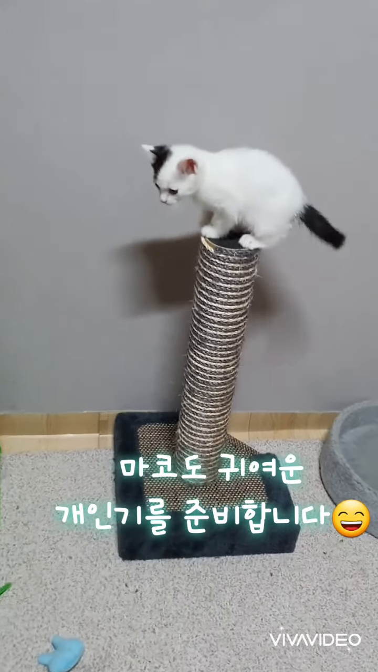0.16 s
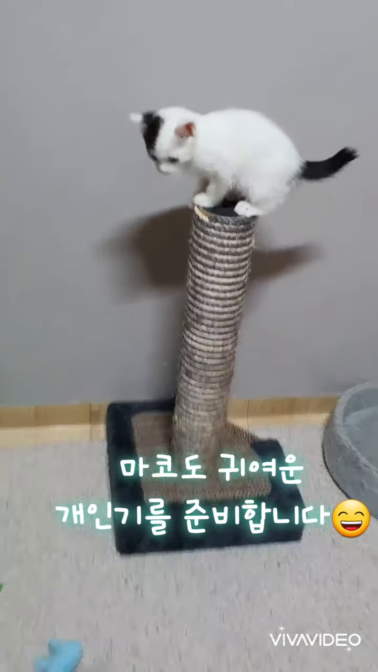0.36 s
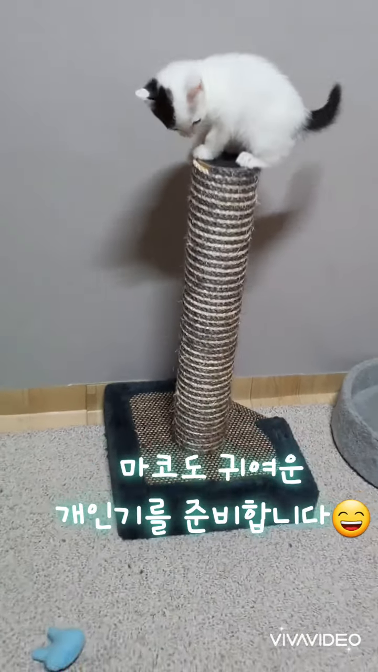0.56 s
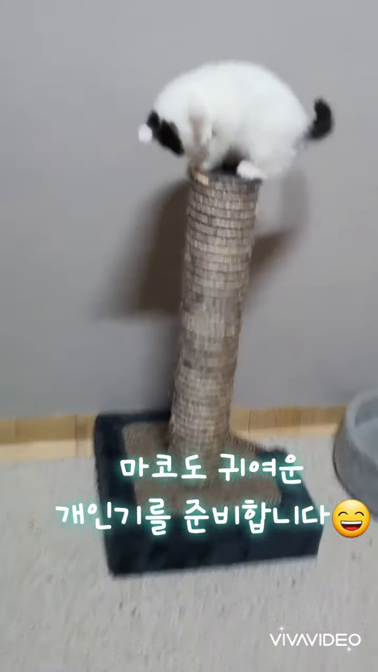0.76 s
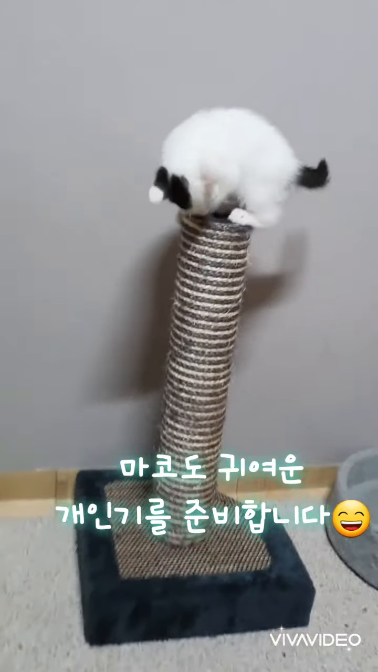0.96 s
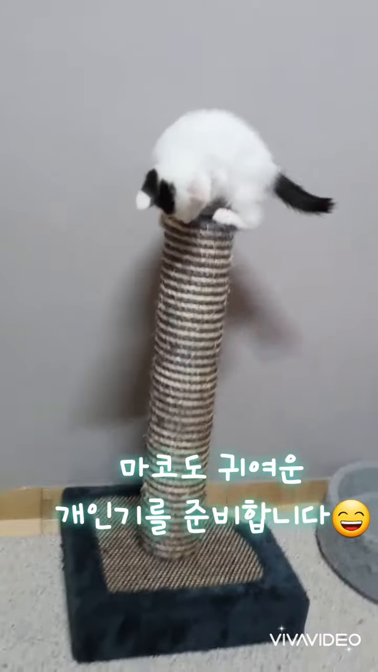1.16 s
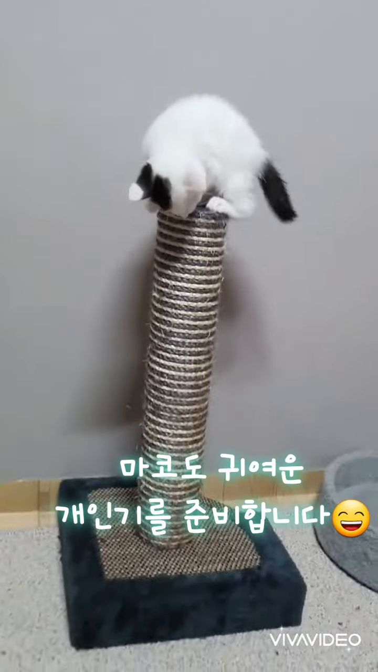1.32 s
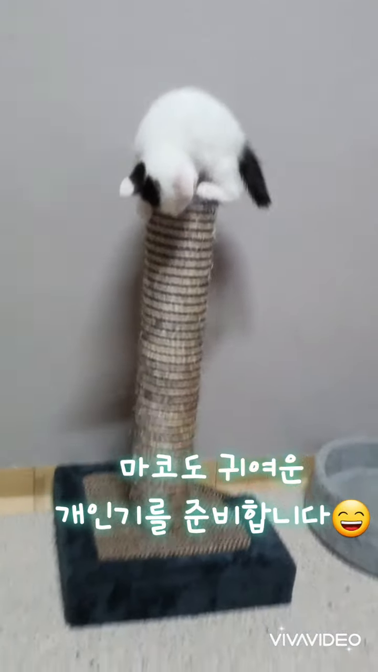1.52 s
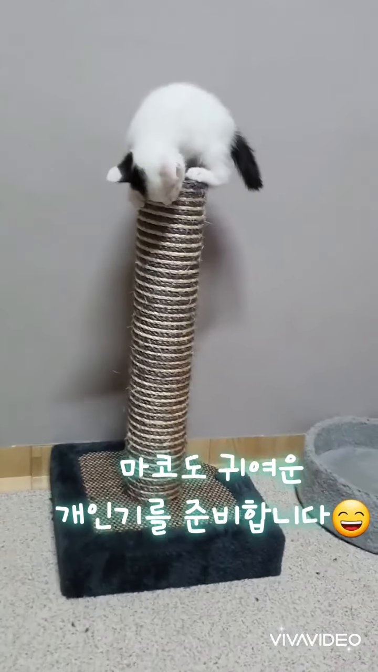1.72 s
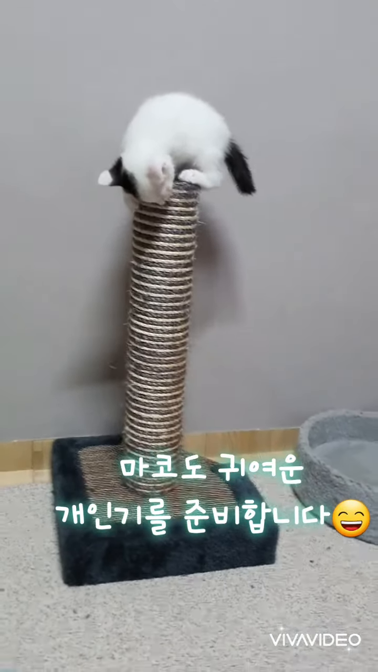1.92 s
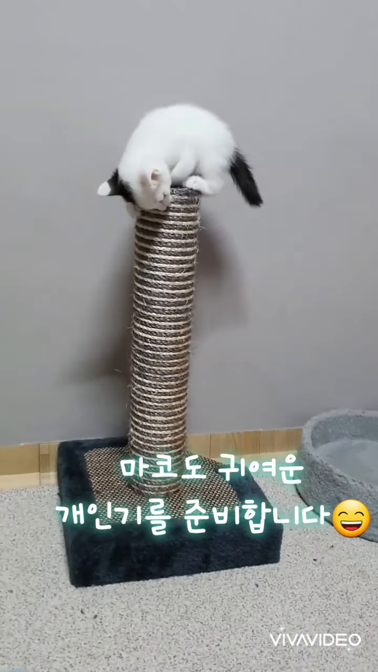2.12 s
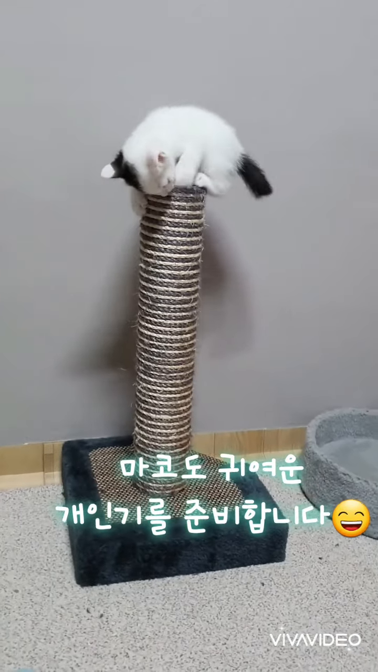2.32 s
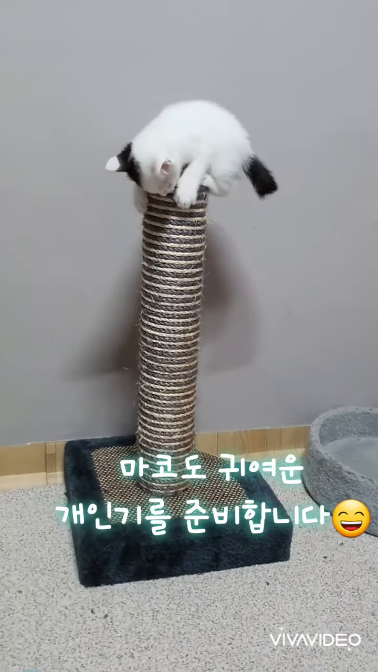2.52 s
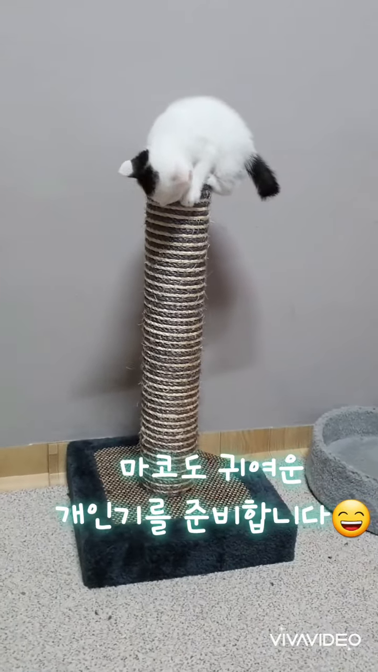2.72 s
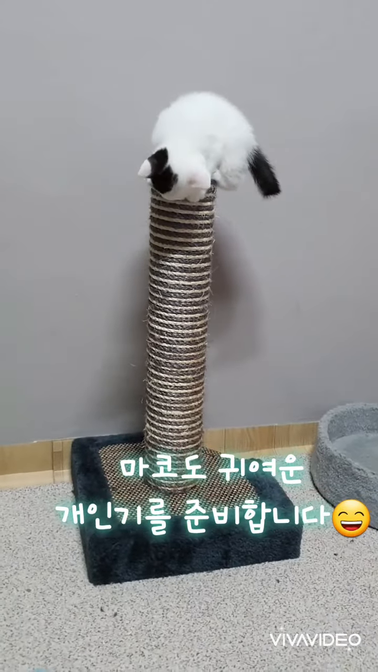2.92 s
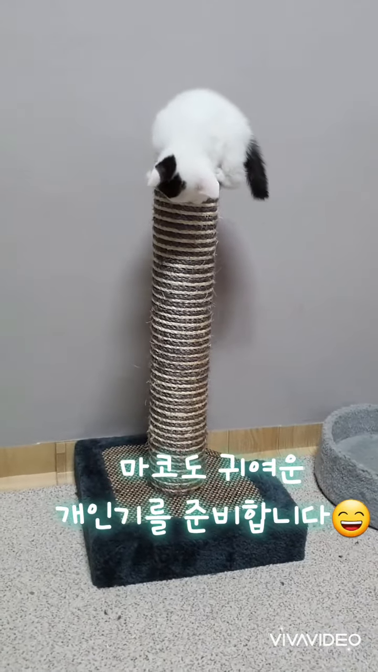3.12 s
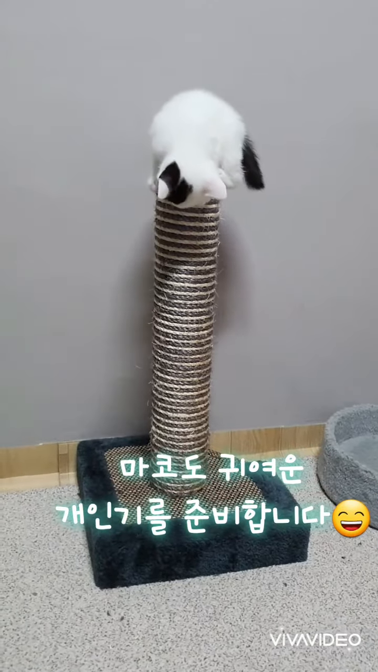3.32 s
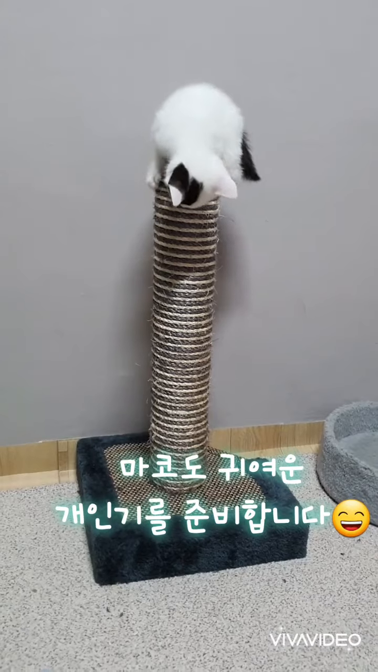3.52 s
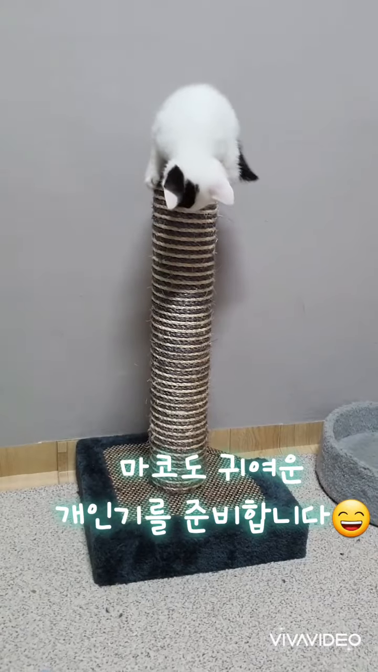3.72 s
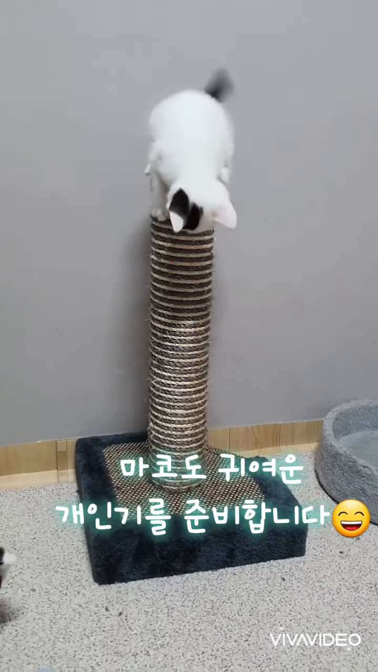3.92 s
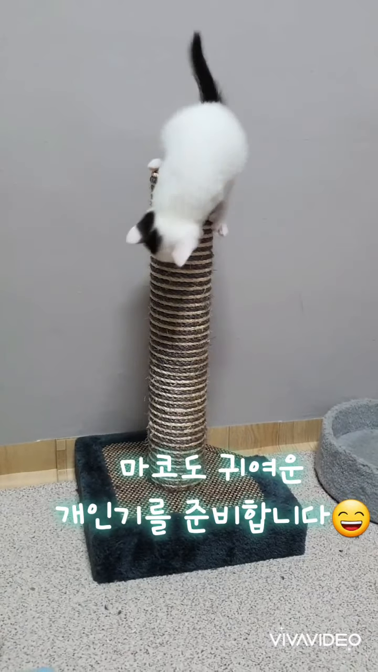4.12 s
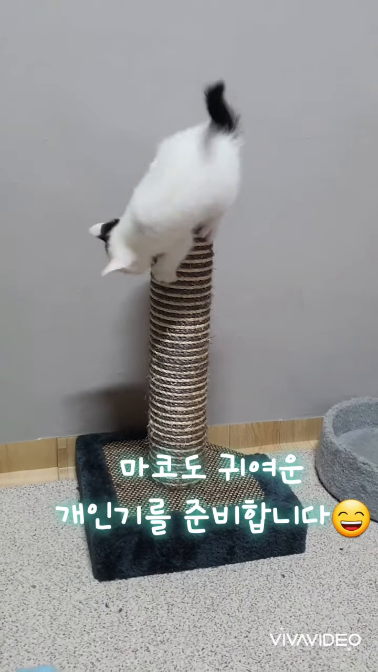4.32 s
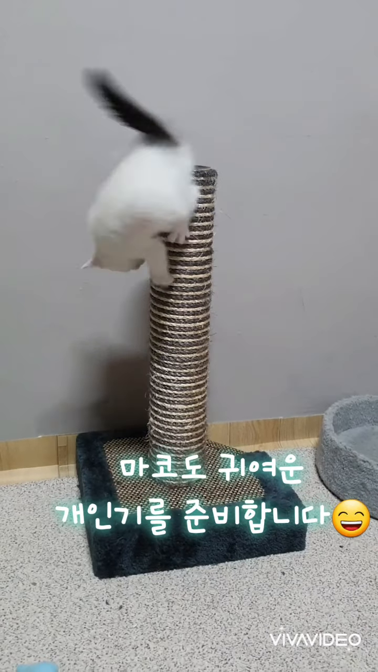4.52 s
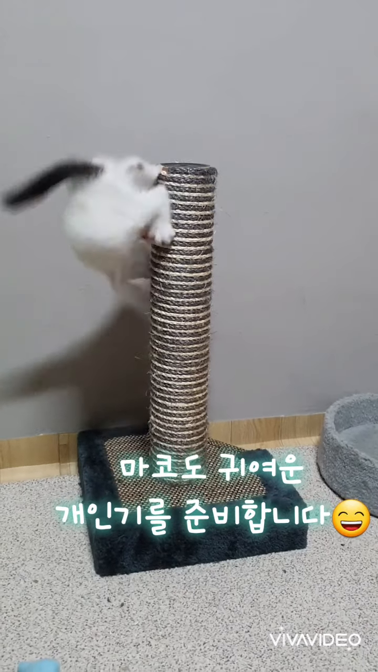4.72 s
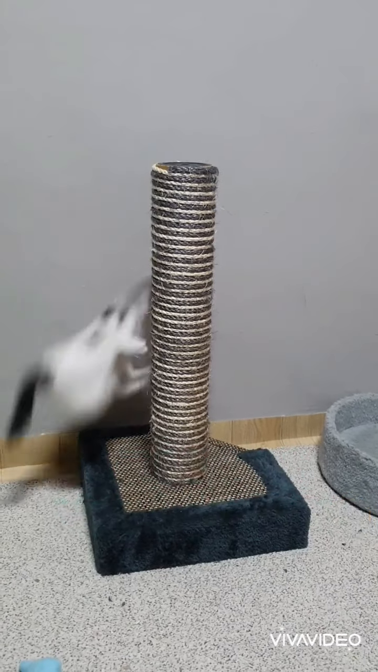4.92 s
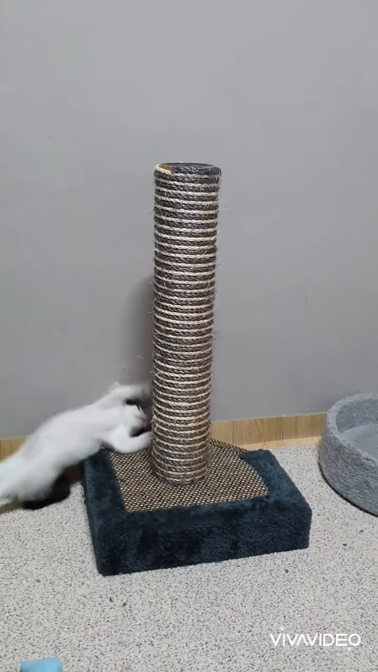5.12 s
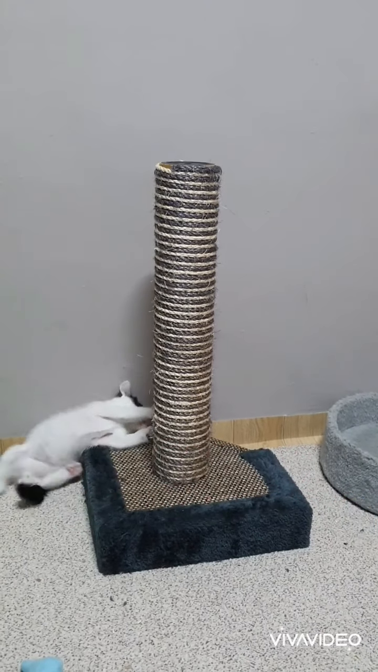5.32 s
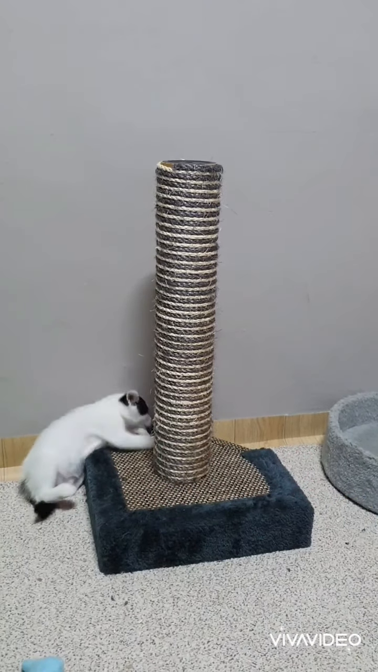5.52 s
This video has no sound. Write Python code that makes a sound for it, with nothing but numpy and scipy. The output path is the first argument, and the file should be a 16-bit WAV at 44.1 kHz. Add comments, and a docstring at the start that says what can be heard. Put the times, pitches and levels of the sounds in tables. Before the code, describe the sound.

A small bare-walled room with a short ring. Light paw thuds and thread ticks come first, then isolated claw plucks on coarse rope, a sharp snag just before three seconds, a quiet pause, and a final scrabble with hollow thumps as the kitten tumbles down. Thin hiss and low hand rumble lie beneath; the close phone sound leans right.

```python
"""Cloth rustles and ticks close to the right, over soft knocks; then a kitten claws a rope-wound scratching post.
Claws drag over the strands as random snaps and tear loose in short, fading bursts.
Paws and body knock the hollow post, heard as a set of decaying modes, and a bare-walled room rings on.
The microphone is a hand-held phone with two ports; hand rumble and a thin hiss lie underneath."""
import sys
import numpy as np
from scipy import signal
from scipy.fft import rfft, irfft
from scipy.io import wavfile

SR = 44100
rng = np.random.default_rng(int(sys.argv[2]) if len(sys.argv) > 2 else 0)


def transcribe(signal):
    """Save signal, clipped to [-1, 1], as a 16-bit WAV file at the path in sys.argv[1]."""
    frames = np.atleast_2d(signal).T
    limited = np.clip(frames, -1, 1)
    pcm = np.round(limited * 32767).astype(np.int16)
    wavfile.write(sys.argv[1], SR, pcm)


N = 245195
RING = SR * 3 // 4  # longest ringing, in samples

# Strokes of the claws over the rope.
# Each row: start in seconds, length in seconds, level in dB before the layer gains, relative treble in dB.
CLAW_DRAGS = [(1.076, .12, -54, 4), (1.24, 0.056, -58, -17), (1.601, 0.1, -46, -11),
              (2.23, 0.069, -51.5, -16), (2.369, .1, -52, -4), (2.515, .195, -37, -1.5),
              (2.803, 0.092, -48.5, 3), (3.18, 0.072, -59, -7), (3.497, 0.051, -58, -9.5),
              (3.938, 0.097, -51, 1), (4.049, 0.11, -49, 4.5), (4.255, 0.34, -41.5, 2),
              (4.587, 0.16, -37.5, -0.5), (4.743, 0.12, -40, 0.5), (4.846, 0.14, -40, 6.5),
              (5.029, 0.12, -34, -25), (5.25, 0.017, -53, -21)]
# Spectrum of the rasping rope. Each row: frequency in Hz, gain in dB.
ROPE_SPECTRUM = [(80, -11), (250, -3.5), (600, 2.5), (830, 7.5), (1300, 2.5), (2000, -6.5), (3000, -3.5),
                 (5000, -13), (11000, -17.5)]
# Spectrum of the loose fibres. Each row: frequency in Hz, gain in dB.
FIBRE_SPECTRUM = [(300, -37.5), (1500, -2), (3000, -2), (6000, 5.5), (11000, -6)]
# a stroke grips quickly, weakens as the leg draws in, and lets go
DRAG_ATTACK_S, DRAG_SAG_DB_PER_S, DRAG_RELEASE_S = 0.027, 17.5, 0.0053


def drags(rope_db=0.0, fibre_db=-5, jerk_db=4, jerk_rate=60):
    """Claws stick and slip from strand to strand: the rope rasps low, its loose fibres crackle high."""
    grip, fray = np.zeros((2, N))
    for start_s, length_s, db, treble_db in CLAW_DRAGS:
        envelope = stroke(start_s, length_s, DRAG_ATTACK_S, DRAG_SAG_DB_PER_S, DRAG_RELEASE_S)
        pull = undb(db) * envelope
        grip += pull
        fray += pull * undb(treble_db)
    jerks = unit(undb(jerk_db * walk(jerk_rate)))
    slips = snaps(rate=1500, spread_db=4.5) * grip * jerks
    # every strand has its own tension, so the octave bands of the rasp wander separately
    rasp = np.zeros(N)
    for low_hz in 75 * 2 ** np.arange(7):
        band = butter(slips + 1e-18, [low_hz, 2 * low_hz], "band")
        rasp += band * unit(undb(3.5 * walk(25)))
    crackle = snaps(rate=2000, spread_db=13.0) * fray * jerks
    scrape = undb(rope_db) * colour(rasp, ROPE_SPECTRUM) + undb(fibre_db) * colour(crackle, FIBRE_SPECTRUM)
    return place(scrape, left_db=-17, right_db=1.0, room_db=3.0)


# A claw catches and tears through fibres.
# Each row: start in seconds, level in dB before the layer gains, fading time constant in seconds,
# relative treble in dB, ring of the plucked strand in Hz.
CLAW_RIPS = [(0.876, -40, 0.022, -10, 1080), (1.241, -28.5, 0.0064, 5, 2500),
             (1.601, -39.5, 0.022, 4.5, 1320), (1.868, -37, 0.0097, -15, 1620),
             (2.214, -36.5, 0.0078, -2, 1710), (2.238, -26.5, 0.0039, -19, 1210),
             (2.509, -23, 0.014, -21, 1160), (2.528, -37.5, 0.019, 16, 1700), (2.695, -18, 0.0024, -2, 880),
             (2.865, -10, 0.016, -3, 2030), (3.179, -39.5, 0.0063, -1, 838),
             (3.909, -45.5, 0.028, 6.5, 1370), (3.989, -43, 0.0029, 18, 1000),
             (4.249, -36.5, 0.0073, 9, 830), (4.45, -29, 0.0046, -2, 1480), (4.493, -32, 0.0075, 9.5, 2330),
             (4.6, -31.5, 0.014, 12.5, 2750), (4.674, -19, 0.011, -12, 1710),
             (4.799, -16, 0.0021, 4.5, 880), (4.826, -26.5, 0.0074, 7, 1300), (4.867, -27.5, 0.007, 1, 770),
             (5.009, -23, 0.023, 8.5, 825), (5.137, -33.5, 0.0074, 5.5, 1610),
             (5.248, -48.5, 0.016, 6.5, 1210), (5.393, -62, .01, 10, 680),
             (5.546, -55.5, 0.0077, 0.5, 1290)]


def rips(rope_db=-1, fibre_db=-2, strand_db=-4, bite_s=0.00085):
    """A hooked claw bites and tears loose: snaps that fade out and set the strand ringing."""
    rope, strands, fibres = np.zeros((3, N))
    t = np.arange(RING) / SR
    coarse = snaps(rate=5000, spread_db=4.5)
    fine = snaps(rate=10000, spread_db=0.5)
    for start_s, db, fade_s, treble_db, strand_hz in CLAW_RIPS:
        bite = 1 - np.exp(-t / bite_s)
        pull = undb(db) * np.exp(-t / max(fade_s, 1 / SR)) * bite
        first = rng.integers(N - RING)  # a random stretch of snaps for each rip
        tear = pull * coarse[first:first + RING]
        ring = butter(tear, [strand_hz / 1.45, strand_hz * 1.45], "band")
        add(rope, start_s, tear)
        add(strands, start_s, ring * np.sqrt(SR / strand_hz) / 2)  # evens out the bandwidths
        add(fibres, start_s, pull * undb(treble_db + fibre_db) * fine[first:first + RING])
    sound = undb(rope_db) * colour(rope, ROPE_SPECTRUM) + undb(strand_db) * strands
    sound = sound + colour(fibres, FIBRE_SPECTRUM)
    return place(sound, left_db=-17.5, right_db=-6.0, room_db=-5.0)


# Paws and body knock the post.
# Each row: start in seconds, level in dB, pitch of the contact in Hz (low for soft pads, high for hard claws).
POST_KNOCKS = [(0, -54.5, 430), (0.14, -57, 373), (0.428, -56.5, 397), (0.535, -52, 192), (0.735, -48, 178),
               (1.062, -44, 300), (1.0798, -30, 383), (1.155, -47, 327), (1.239, -46, 390), (1.3, -40, 93),
               (1.347, -44.5, 170), (1.602, -38.5, 110), (1.614, -44.5, 365), (1.68, -42.5, 127),
               (1.871, -42, 276), (1.895, -39, 126), (2.235, -40.5, 274), (2.41, -55.5, 258),
               (2.515, -38.5, 257), (2.591, -37, 111), (2.672, -28.5, 195), (2.697, -26, 335),
               (2.733, -54, 110), (2.865, -18, 380), (3.188, -39, 266), (3.907, -55, 199),
               (3.984, -56.5, 249), (4.166, -49, 167), (4.26, -36.5, 202), (4.331, -44, 195),
               (4.399, -37.5, 256), (4.46, -30, 81), (4.491, -21, 210), (4.513, -29, 335), (4.613, -33, 98),
               (4.677, -21.5, 268), (4.954, -45, 88.6), (5.014, -32, 327), (5.082, -25, 204),
               (5.114, -26, 308), (5.395, -68, 391)]
# Ringing of the post on its base and floor, before each blow reshapes it.
# Each row: frequency in Hz, level in dB, time to fade by 60 dB in seconds.
POST_MODES = [(60.2, -7, 0.58), (89.7, -0.5, .33), (112.9, -11, 0.46), (166, -1.5, 0.12), (191.8, 2, 0.14),
              (273.3, -1.5, 0.15), (326, 0, 0.16), (401, -10.5, 0.33), (485.6, -11, 0.27), (553, -10, 0.34),
              (760, -10, 0.57), (850, -21, 0.26), (970, -11, 0.074), (1100, -9.5, 0.16)]


def knocks(thud_s=0.015, thud_db=-1, room_db=-4, push_s=0.0016, above=1.35):
    """Each blow rings the post and shakes its padded base; softer contacts reach only the lower modes."""
    t = np.arange(RING) / SR
    hz, db, t60_s = np.transpose(POST_MODES)[:, :, None]
    modes = undb(db) * np.sin(2 * np.pi * hz * t) * np.exp(-np.log(1000) * t / t60_s)
    out = np.zeros((2, N))
    for start_s, level_db, contact_hz in POST_KNOCKS:
        # where the paw lands sets the sign and share of each mode
        signs = rng.choice([-1, 1], len(POST_MODES))
        shares = signs * undb(2 * rng.standard_normal(len(POST_MODES)))
        thud = butter(rng.standard_normal(RING), [85, max(2 * contact_hz, 120)], "band")
        thud = thud * np.exp(-t / thud_s)
        push = 1 - np.exp(-t / push_s)
        body = (unit(shares @ modes) + undb(thud_db) * unit(thud)) * push
        body = butter(body, above * contact_hz, "low", order=3)
        body = butter(body, 0.42 * contact_hz, "high")
        sound = body + undb(room_db) * convolve(body, room())
        onset_level = np.std(sound[:, :SR // 40])  # the first 25 ms set the loudness
        add(out, start_s, sound * undb(level_db) / onset_level)
    return out


# Slides of cloth close to the phone.
# Each row: start in seconds, length in seconds, level in dB before the layer gains.
CLOTH_SLIDES = [(-.06, 0.052, -48), (0.061, 0.377, -55), (0.15, 0.11, -55.5), (0.426, 0.36, -47.5),
                (0.8, 0.29, -49), (1.006, 0.45, -50.5), (1.538, 0.28, -52), (1.894, 0.29, -63),
                (2.129, 0.22, -57.5), (2.373, 0.28, -53), (3.004, 0.28, -64.5), (3.443, 0.072, -56),
                (3.604, .12, -62.5), (3.80, 0.11, -65.5), (4.067, 0.193, -58), (5.42, 0.068, -78)]
# Spectrum of the sliding cloth. Each row: frequency in Hz, gain in dB.
CLOTH_SPECTRUM = [(40, -23.5), (90, -9), (200, 2.5), (450, 5.5), (800, -3), (2000, -2.5), (5000, 3.5),
                  (11000, -3.5)]
# Spectrum of a snagging thread, also played by ticks(). Each row: frequency in Hz, gain in dB.
THREAD_SPECTRUM = [(100, 3.5), (1000, -3), (3000, 1.5), (6000, 7.5), (11000, 3.5)]
# a slide gathers speed, slows gradually and comes to rest
SLIDE_ATTACK_S, SLIDE_SAG_DB_PER_S, SLIDE_RELEASE_S = 0.092, 1.5, 0.042


def rustle(level_db=-2, flutter_db=2.5, snag_db=-4, rest_db=-75):
    """Cloth sliding beside the right port: fine, dense grains, and now and then a thread that snags."""
    slides = np.zeros(N)
    for start_s, length_s, db in CLOTH_SLIDES:
        envelope = stroke(start_s, length_s, SLIDE_ATTACK_S, SLIDE_SAG_DB_PER_S, SLIDE_RELEASE_S)
        slides += undb(db) * envelope
    speed = (slides + undb(rest_db)) * undb(level_db + flutter_db * walk(45))
    grains = colour(snaps(rate=8200, spread_db=7.0) * speed, CLOTH_SPECTRUM)
    snags = colour(snaps(rate=70, spread_db=4) * speed * undb(snag_db), THREAD_SPECTRUM)
    close_snags = snags * undb([[-13], [0]])  # left and right port, without room
    return place(grains, left_db=-26.0, right_db=3.5, room_db=1.0) + close_snags


# The sharpest single ticks of thread.
# Each row: start in seconds before a tiny fixed delay, level in dB before the layer gains.
THREAD_TICKS = [(0.509, -43), (0.5416, -25.5), (0.5658, -24.5), (0.615, -25), (0.6927, -23.5),
                (0.7587, -23.5), (0.9202, -30.5), (1.0549, -30.5), (1.1006, -26.5), (1.1764, -27.5),
                (1.3336, -28.5), (1.4598, -34), (1.5599, -36), (1.7434, -34.5), (1.7865, -35),
                (1.8167, -34), (1.8844, -36), (2.0525, -39.5), (2.157, -39), (2.1798, -34.5), (2.4936, -33),
                (2.5272, -26.5), (2.8661, -15), (3.2253, -33), (3.829, -45.5), (4.259, -33), (4.6025, -25),
                (4.6574, -22), (4.773, -25.5), (4.799, -19), (4.8686, -30), (5.0071, -18)]


def ticks(level_db=4, fade_s=0.0022, scuff_db=-11):
    """Single threads snag and let go: a click with a tiny scuff behind it."""
    out = np.zeros(N)
    t = np.arange(SR // 100) / SR
    for start_s, db in THREAD_TICKS:
        click = undb(scuff_db) * rng.standard_normal(len(t)) * np.exp(-t / fade_s)
        click[0] = 1
        add(out, start_s + 0.00037, undb(db + level_db) * click)
    return place(colour(out, THREAD_SPECTRUM), left_db=-20, right_db=5.5, room_db=-3.5)


def handling(level_db=-59, left_db=-6, low_hz=52, high_hz=115, moving_s=4.9,
             attack_s=0.35, sag_db_per_s=0.6, release_s=0.1):
    """The hand's small tremors rumble through the phone's case while it follows the kitten."""
    rumble = unit(butter(rng.standard_normal(N), [low_hz, high_hz], "band"))
    movement = stroke(0, moving_s, attack_s, sag_db_per_s, release_s)
    return rumble * movement * undb(level_db + 2 * walk(18)) * undb([[left_db], [-2]])


# Spectrum of the quiet room. Each row: frequency in Hz, gain in dB.
AIR_SPECTRUM = [(20, 1), (65, 2), (120, -8), (300, 6), (700, -2.5), (2000, -16), (5000, -11.5),
                (11000, -27)]


def air(level_db=-71):
    """Faint rumble of the room, alike at both ports, under a thin hiss that differs between them."""
    rumble = butter(rng.standard_normal(N), 400, "low")
    hiss = butter(rng.standard_normal((2, N)), 400, "high")
    return colour(rumble + hiss, AIR_SPECTRUM) * undb(level_db + 2 * walk(0.91))


ROOM_T60_LOW_S, ROOM_T60_HIGH_S = 0.42, 0.34  # time to fade by 60 dB


def room(shared_hz=620, build_s=0.0015, apart_db=-10):
    """Diffuse tail of bare walls, unit energy; long waves reach both ports nearly alike."""
    t = np.arange(RING) / SR
    waves = rng.standard_normal(RING) + undb(apart_db) * rng.standard_normal((2, RING))
    low = butter(waves, shared_hz, "low") * np.exp(-np.log(1000) * t / ROOM_T60_LOW_S)
    high = butter(rng.standard_normal((2, RING)), shared_hz, "high")
    high = high * np.exp(-np.log(1000) * t / ROOM_T60_HIGH_S)
    return unit((low + high) * (1 - np.exp(-t / build_s))) / np.sqrt(RING)


def place(x, left_db, right_db, room_db, count=3):
    """The direct sound at each port, and a tail whose echoes change as the point of contact moves."""
    paths = np.array([walk(110) for _ in range(count)])
    paths = paths / np.linalg.norm(paths, axis=0)
    direct = x * undb([[left_db], [right_db]])
    tail = sum(convolve(x * path, room()) for path in paths)
    return direct + undb(room_db) * tail


def stroke(start_s, length_s, attack_s, sag_db_per_s, release_s):
    """Envelope of one rubbing movement: it swells, sags while it lasts, then dies away."""
    t = np.maximum(np.arange(N) / SR - start_s, 0)
    swell = np.sin(np.pi / 2 * np.minimum(t / attack_s, 1)) ** 2
    release = np.exp(-np.maximum(t - length_s, 0) / release_s)
    return swell * undb(-sag_db_per_s * t) * release


def snaps(rate, spread_db):
    """Fibres let go at random, rate times a second, many weakly and a few strongly; rms 1."""
    sizes = undb(spread_db * np.minimum(rng.exponential(size=N), np.pi))
    happens = rng.random(N) < rate / SR
    return unit(happens * sizes * rng.choice([-1, 1], N))


def walk(rate):
    """Random wander with a spread near 1, joining rate random points a second by straight lines."""
    steps = rng.standard_normal(8192)
    return np.interp(np.arange(N) / SR * rate, np.arange(len(steps)), steps)


def undb(db):
    """Decibels to gain."""
    return 10 ** (np.asarray(db) / 20)


def unit(x):
    """Scale to rms 1."""
    return x / np.sqrt(np.mean(x ** 2))


def add(track, s, sound):
    """Mix a sound into a track at a time in seconds."""
    start = max(int(s * SR), 0)
    track[..., start:start + sound.shape[-1]] += sound[..., :N - start]


def convolve(x, response):
    """Pass a sound through a response, keeping its length."""
    return signal.fftconvolve(np.atleast_2d(x), np.atleast_2d(response), axes=-1)[:, :x.shape[-1]]


def response(points, size=4096):
    """Minimum-phase impulse response with a spectrum given as (Hz, dB) points."""
    hz, db = np.transpose(points)
    bins_hz = np.arange(size // 2 + 1) * SR / size
    gain = undb(np.interp(np.log(bins_hz + 1), np.log(hz), db))
    # folding the cepstrum onto positive times makes the response causal
    cepstrum = irfft(np.log(gain))
    cepstrum[1:size // 2] *= 2
    cepstrum[size // 2 + 1:] = 0
    return irfft(np.exp(rfft(cepstrum)))


def colour(x, points):
    """Give a white sound a spectrum without changing its power."""
    h = response(points)
    return convolve(x, h / np.linalg.norm(h))


def butter(x, hz, kind, order=2):
    """Gentle low-, high- or band-pass."""
    edges_hz = np.clip(hz, 10, SR / 2 - 1000)
    return signal.sosfilt(signal.butter(order, edges_hz, kind, fs=SR, output="sos"), x)


def scene():
    """Kitten and post, the small noises close to the phone, and the quiet room."""
    return drags() + rips() + knocks() + rustle() + ticks() + handling() + air()


# Colour of the two microphone ports. Each row: frequency in Hz, left gain in dB, right gain in dB.
PORT_COLOURS = [(20, -14.5, -15.5), (52.4, -1, 0), (300, -3, -0.5), (960, 2.5, 1), (2000, 3, 2.5),
                (2966, -0.5, 1.5), (3800, -2.5, -4.5), (5600, -7.5, -3), (6530, -5.5, 4), (6910, -3, 2.5),
                (7970, -13.5, -8.5), (9770, -4.5, -0.5), (10890, -7, -6), (12170, -23, -29)]
TOP_HZ = 11850  # upper limit of the phone


def record(dry):
    """Each port adds its own treble resonances; the phone cuts the top with a steep low-pass."""
    ports = np.array(PORT_COLOURS)
    left, right = response(ports[:, [0, 1]]), response(ports[:, [0, 2]])
    heard = convolve(dry, np.array([left, right]))
    return signal.sosfilt(signal.ellip(8, 0.2, 70, TOP_HZ, fs=SR, output="sos"), heard)


dry = scene()
out = record(dry)
transcribe(out)
```